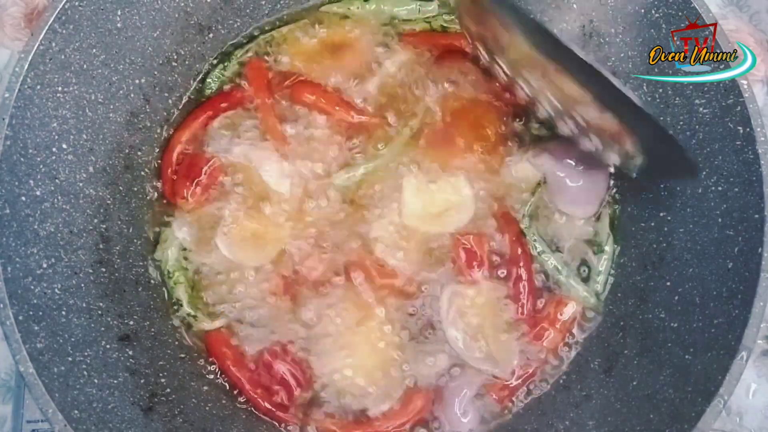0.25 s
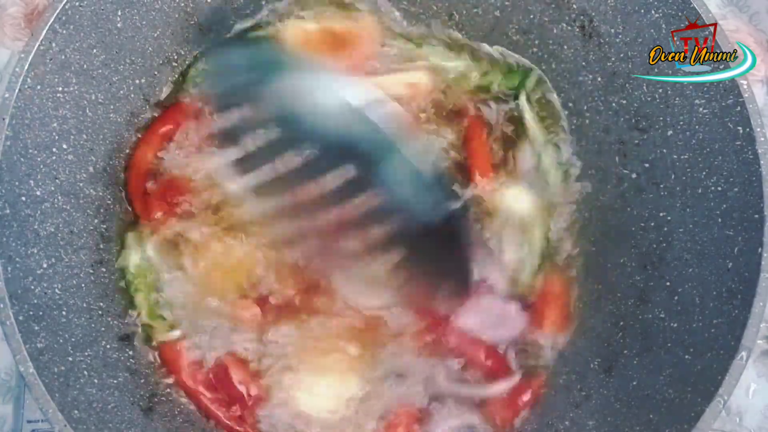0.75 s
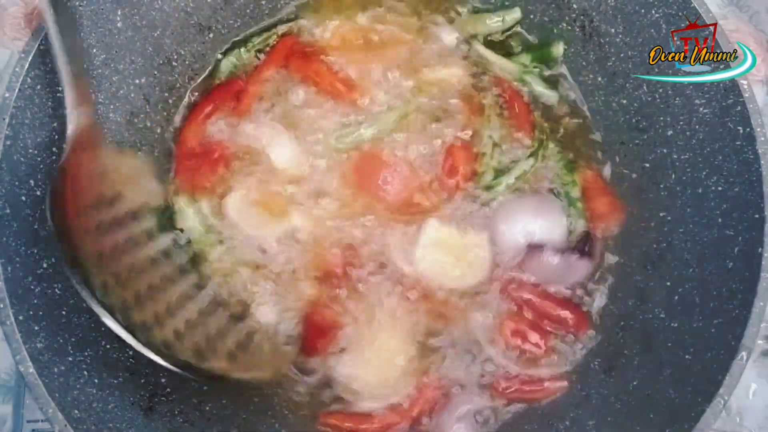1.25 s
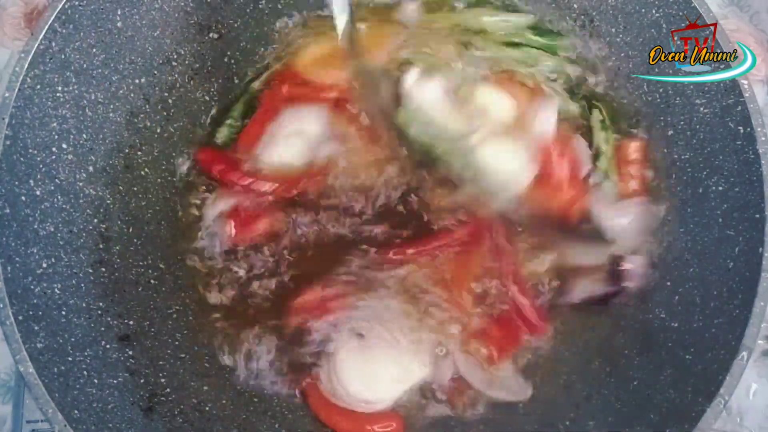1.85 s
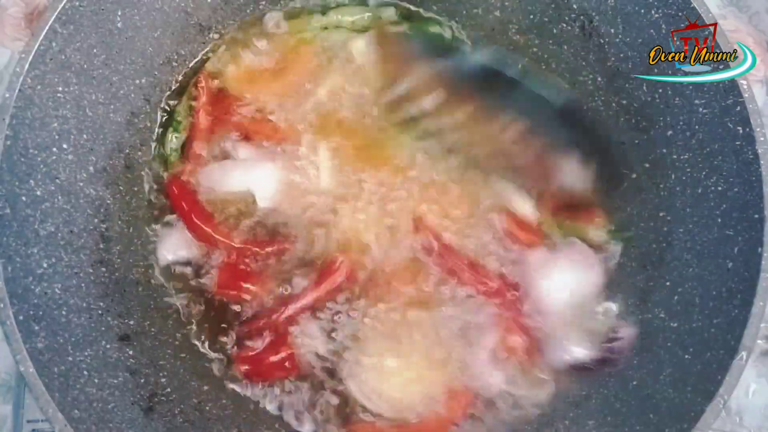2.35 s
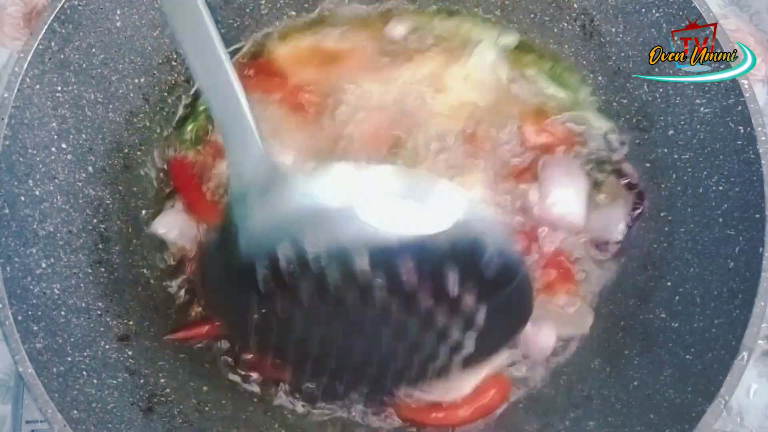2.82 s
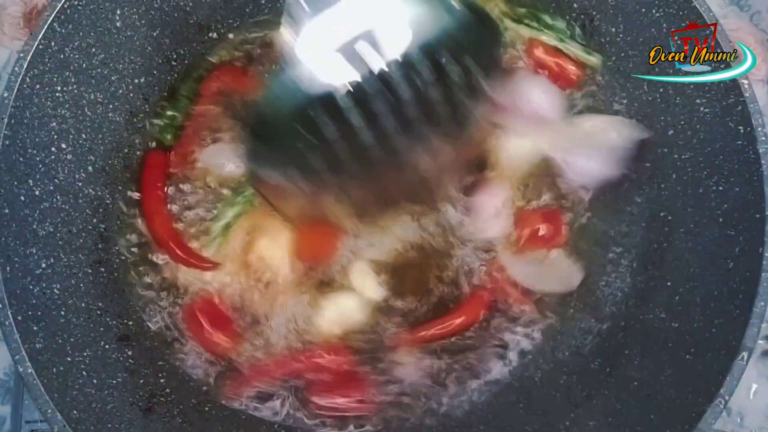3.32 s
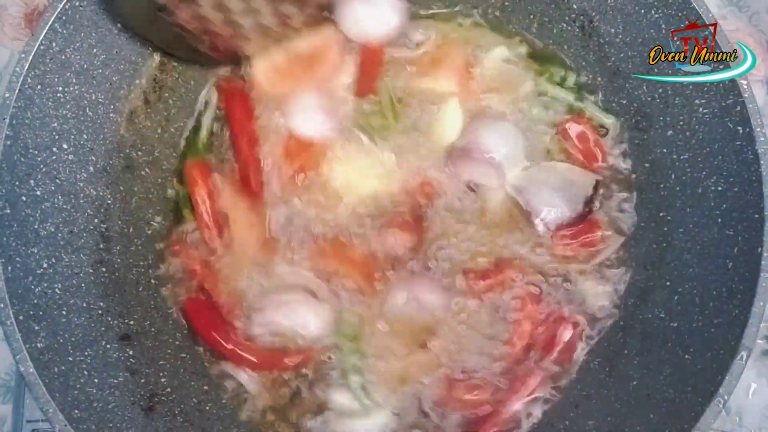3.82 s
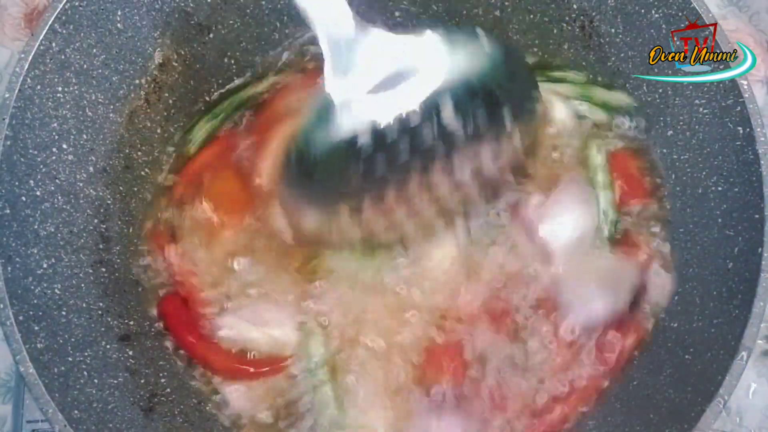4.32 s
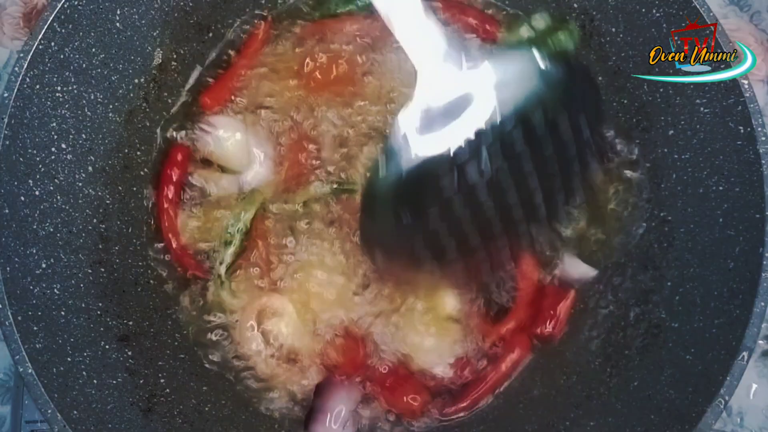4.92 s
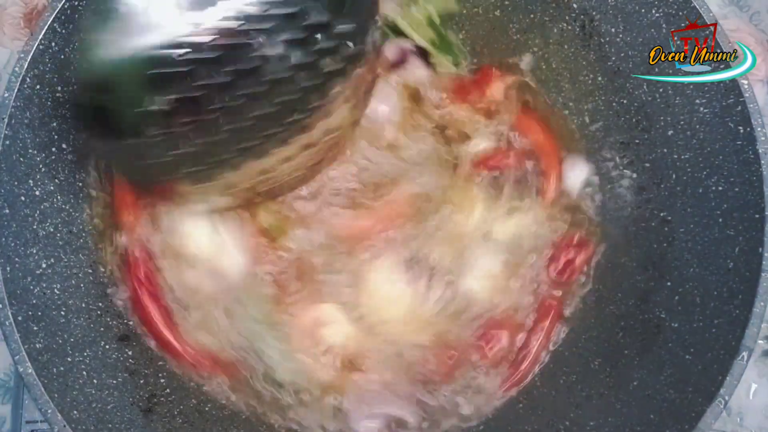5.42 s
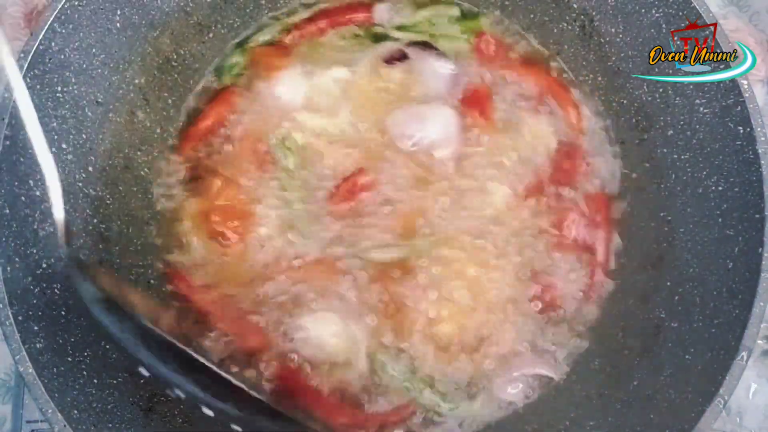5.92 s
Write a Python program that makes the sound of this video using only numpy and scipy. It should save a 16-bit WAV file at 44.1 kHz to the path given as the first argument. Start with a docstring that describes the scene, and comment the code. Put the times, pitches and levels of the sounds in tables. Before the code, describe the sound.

Vegetables sizzle and pop in hot oil while a metal ladle knocks and scrapes dully on a wok.

```python
"""Stir-frying in a wok

Chillies, onion and garlic fry in oil in a small, hard-walled kitchen. Steam bubbles burst as tiny
pitched pips: single ones at first, then a dense sizzle as stirring brings wet pieces into the oil.
A slotted ladle knocks dully and scrapes on the wok, and the room reverberates after every sound."""
import sys
import numpy as np
from scipy import signal
from scipy.fft import rfft, irfft
from scipy.io import wavfile

SR = 44100
rng = np.random.default_rng(int(sys.argv[2]) if len(sys.argv) > 2 else 0)


def dump(signal):
    """Clip the signal to [-1, 1] and save it as 16-bit WAV at the path in sys.argv[1]."""
    limited = np.clip(np.atleast_2d(signal).T, -1, 1)
    pcm = np.round(limited * 32767).astype(np.int16)
    wavfile.write(sys.argv[1], SR, pcm)


N = 271656
TIME = np.arange(N) / SR
CUTOFF_HZ = 15700


def from_db(db):
    return 10 ** (np.asarray(db) / 20)


def unit_rms(x):
    return x / np.sqrt(np.mean(x ** 2) + 1e-20)


def at_hz(table, hz):
    """Interpolation on a logarithmic frequency axis."""
    freqs, values = np.transpose(table)
    return np.interp(np.log(np.maximum(hz, 1)), np.log(freqs), values)


def at_time(table, s=TIME):
    return np.interp(s, *np.transpose(table))


def band(x, low_hz, high_hz, order=2):
    edges = [low_hz, min(high_hz, .48 * SR)]
    return signal.sosfilt(signal.butter(order, edges, "band", fs=SR, output="sos"), x)


def add(track, s, sound):
    start = max(round(s * SR), 0)
    track[start:start + len(sound)] += sound[:max(N - start, 0)]


def coloured_noise(spectrum):
    """Spectral shaping of white noise, at unit rms."""
    gain = from_db(at_hz(spectrum, np.arange(N // 2 + 1) * SR / N))
    return unit_rms(irfft(rfft(rng.standard_normal(N)) * gain, N))


def pips(s, height, hz, swell_s, half_samples):
    """Gaussian tone pulses: sines that swell and fade around the times s."""
    centre = np.round(s * SR).astype(int)[:, None]
    offset = np.arange(-half_samples, half_samples)
    t = offset / SR
    envelope = height[:, None] * np.exp(-(t / np.reshape(swell_s, (-1, 1))) ** 2)
    waves = envelope * np.sin(2 * np.pi * hz[:, None] * t)
    return np.bincount(np.clip(centre + offset, 0, N).ravel(), waves.ravel(), N + 1)[:N]


# Spectrum of the background: f/Hz, relative density level/dB
HISS_SPECTRUM = [(30, -11), (140, 0), (250, -5), (400, -8), (560, -3), (900, -2), (1500, -1), (2200, -4),
                 (3200, -6), (4600, -8), (8000, -9), (10000, -15), (15800, -21)]
def background_hiss(level_db=-69.5):
    """Stationary broadband noise forms a faint, even floor."""
    return from_db(level_db) * coloured_noise(HISS_SPECTRUM)


# Reverberation time: f/Hz, T60/s
ROOM_DECAY = [(80, .41), (210, 0.35), (560, .42), (1500, 0.33), (4000, 0.31), (8000, 0.25), (15000, 0.2)]
# Strength of the reverberation: f/Hz, level/dB re the exciting sound
ROOM_GAIN = [(60, -29.5), (120, 14), (200, 7), (290, -10), (500, -5), (1000, -4), (2200, -1.5), (4000, -7),
             (8000, -6.5), (15000, -6.5)]
def kitchen_response(onset_s=0.001):
    """Diffuse reverberation: dense wall reflections decay exponentially in each band, the lows last."""
    t = np.arange(round(.7 * SR)) / SR
    white, response = rng.standard_normal((2, len(t))), 0
    onset = 1 - np.exp(-(t / onset_s) ** 2)
    edges = 45 * 2 ** np.arange(0, 9, .5)  # half octaves
    for k, (low, high) in enumerate(zip(edges, edges[1:])):
        hz = np.sqrt(low * high)
        tail = band(white[k % 2], low, high, order=3) * from_db(-60 * t / at_hz(ROOM_DECAY, hz)) * onset
        unity_gain = np.sqrt(2 * (high - low) / SR / np.sum(tail ** 2))
        response += tail * unity_gain * from_db(at_hz(ROOM_GAIN, hz))
    return response


# The ladle dragging over the wok's bottom: t/s, level/dB
SCRAPE_LEVEL = [(0.345, -100), (0.36, -47), (0.41, -49), (0.46, -58), (0.5, -100), (3.81, -100),
                (3.83, -51), (3.9, -49.5), (3.96, -49), (4.0, -43), (4.1, -51), (4.19, -60.5),
                (4.27, -73.5), (4.4, -100)]
# Spectrum of the scrape: f/Hz, relative density level/dB
SCRAPE_SPECTRUM = [(60, -13), (110, -17.5), (175, 8.5), (280, 2), (500, -3.5), (800, 8.5), (1300, -2.5),
                   (2000, -10.5), (2800, -28), (6000, -29.5)]
def ladle_scrape(slips_per_s=130, uneven_db=6.5):
    """Stick-slip friction: the ladle catches and slips, modulating a noise unevenly."""
    slips = np.interp(TIME * slips_per_s, np.arange(3000), rng.standard_normal(3000))
    roughness = unit_rms(from_db(uneven_db * slips))
    return from_db(at_time(SCRAPE_LEVEL)) * roughness * coloured_noise(SCRAPE_SPECTRUM)


# Ladle on wok: t/s, edge level/dB, centre f/Hz, bandwidth/centre, crack level/dB re edge,
# bowl delay/s, bowl level/dB, thump drive/dB re bowl, rattle level/dB re edge
IMPACTS = [(.3440, -17.5, 1380, 0.42, -23.5, 0.0047, -23.5, -5.5, -10.5),
           (0.3553, -36, 960, 0.563, -44, 0.0018, -28, -23, 7.5),
           (0.3795, -35, 1500, 0.35, -40, 0.0016, -45, -25, -10),
           (0.4028, -31, 1970, 0.55, -40, .003, -31, -30, -17),
           (0.4192, -21.5, 3110, 0.25, -47, 0.0005, -47, -27, -45),
           (0.4355, -52, 1670, 0.47, -30, 0.0017, -43, -28, 1),
           (0.4565, -52, 2900, 0.25, -30, 0.00057, -56, -31, -12),
           (1.253, -19, 1247, 0.66, -18.5, 0.001, -12, -26, -24),
           (2.9598, -48.5, 988, 0.444, -44.5, 0.00005, -22, -13.5, 4),
           (3.8188, -17, 1440, 0.38, -12.5, 0.0048, -20, -17, -12),
           (3.828, -23, 1780, 0.3, -8, 0.0022, -39.5, -3.5, -15.5),
           (3.851, -53, 1470, 0.42, -22, 0.0025, -31, -22, -10),
           (3.981, -24.5, 1205, 0.46, -36, 0.01176, -30.5, -6, -5.5),
           (4.023, -46.5, 1570, 0.41, -30, 0.00204, -35, -18, 0),
           (4.071, -54, 1470, 0.365, -32.5, 0.0022, -45, -16, 3),
           (4.085, -39.5, 2160, 0.2, -19, .003, -52, -25, -1),
           (5.9151, -40.5, 1183, 0.29, 0, 0.0035, -34, 2.5, 5),
           (6.1187, -40.5, 1095, 0.4, -21, 0.0013, -21, -14, -8.5)]
def ladle_contacts(bowl_pitch_ratio=0.5355, edge_thump_db=-29.5, bowl_crack_db=-34):
    """Double impact: the ladle's edge cracks on the wok, then its bowl lands, lower and with a thump."""
    for s, db, hz, width, crack_db, delay_s, bowl_db, thump_db, _ in IMPACTS:
        bowl_hz = bowl_pitch_ratio * hz
        yield s, db, hz, width * hz, edge_thump_db, crack_db
        yield s + delay_s, bowl_db, bowl_hz, width * bowl_hz, thump_db, bowl_crack_db


def ladle_rattle(gap_s=0.0032, loss_db=0.5, pitch_ratio=0.64, scatter_octaves=0.7, cycles=0.98, taps=8):
    """Rebound: after each knock the ladle judders in a dying run of dull taps of scattered pitch."""
    out = np.zeros(N)
    for s, db, hz, *_, rattle_db in IMPACTS:
        times = s + np.cumsum(gap_s * (.5 + rng.random(taps)))
        pitches = pitch_ratio * hz * 2 ** (scatter_octaves * np.clip(rng.standard_normal(taps), -2, 1))
        heights = from_db(db + rattle_db - loss_db * np.arange(taps))
        out += pips(times, heights, pitches, cycles / pitches, half_samples=300)
    return out


# Modes of the steel ladle: f/Hz, level/dB re crack, T60/s
STEEL_MODES = [(2530, -8.5, 0.052), (3230, -2, 0.044), (3695, -12.5, 0.12), (4946, -14, 0.12)]
# Modes of the oil-damped wok: f/Hz, relative level/dB, T60/s
WOK_MODES = [(95, -4, 0.12), (158, -17.5, 0.27), (194, -16, 0.13), (446, -29, 0.15), (490.8, -23.5, 0.14),
             (650, -36, 0.12), (833, -21.5, 0.33), (1040, -36.5, 0.2), (1226, -45.5, 0.13),
             (1205, -30.5, 0.1), (1370, -39, 0.177), (1474, -42, .15), (1860, -32.5, 0.11)]
def ladle_knocks(gain_db=1, thump_hz=125, thump_s=0.0028, thump_gain_db=-12, crack_s=0.007,
                 wok_gain_db=-5, detune=0.018):
    """Impact excitation: a clack, a low thump and a bright crack, with free decay of ladle and wok."""
    out, t = np.zeros(N), np.arange(SR // 2) / SR
    thump = t / thump_s * np.exp(1 - t / thump_s) * np.sin(2 * np.pi * thump_hz * t)

    def mode(hz, db, t60):
        return from_db(db + rng.normal(0, 2) - 60 * t / t60) * np.sin(2 * np.pi * hz * t)

    for s, db, hz, width_hz, thump_db, crack_db in ladle_contacts():
        age = np.pi * width_hz * t  # dimensionless: a wider band makes a shorter pulse
        clack = np.exp(-((age - 2.2) / 1.2) ** 2) * np.sin(2 * hz / width_hz * (age - 2.2))
        bright_noise = band(rng.standard_normal(len(t)), 2000, 6400, order=5)
        crack = bright_noise * np.exp(-t / crack_s) * np.tanh(age)
        knock = clack + from_db(thump_db + thump_gain_db) * thump + from_db(crack_db) * crack
        for mode_hz, mode_db, t60 in STEEL_MODES:
            # grip and clinging oil retune the ladle at every contact
            knock += mode(mode_hz * (1 + detune * rng.standard_normal()), crack_db + mode_db, t60)
        for mode_hz, mode_db, t60 in WOK_MODES:
            # the thump rocks the whole wok; a soft contact barely drives modes above its own pitch
            drive = from_db(thump_db) if mode_hz < 300 else 1 / (1 + (mode_hz / (hz + width_hz)) ** 6)
            knock += drive * mode(mode_hz, mode_db + wok_gain_db, t60) * rng.choice([-1, 1])
        add(out, s, from_db(db + gain_db) * knock)
    return out


def hollow_wok(x, dip_hz=305, dip_q=4.4):
    """A spectral notch: the wok radiates little between thump and bowl tone, so it sounds hollow."""
    return signal.lfilter(*signal.iirnotch(dip_hz, dip_q, fs=SR), x)


def bursts_per_s(level_db, rest_per_s=20, boil_per_s=480, boil_db=-47):
    """The burst rate grows linearly with the amplitude of the frying."""
    return rest_per_s + boil_per_s * from_db(level_db - boil_db)


def stray_bubbles(per_s=15, low_hz=3300, high_hz=15000, level_db=-55, spread_db=3.5):
    """A steady Poisson process: even in resting oil a lone small bubble bursts now and then."""
    times = TIME[rng.random(N) < per_s / SR]
    place, strength = rng.random((len(times), 2)).T
    heights = from_db(level_db + spread_db * (2 * strength - 1))
    return pips(times, heights, low_hz + (high_hz - low_hz) * place, swell_s=0.0018, half_samples=400)


def gurgles(share=0.13, threshold_per_s=250, low_hz=1750, high_hz=2400, level_db=-49, spread_db=4):
    """Larger bubbles resonate lower; these surface only once the oil boils hard."""
    per_s = share * (bursts_per_s(at_time(VIGOUR_LEVEL)) - threshold_per_s)
    times = TIME[rng.random(N) < per_s / SR]
    place, strength = rng.random((len(times), 2)).T
    heights = from_db(level_db + spread_db * (2 * strength - 1))
    hz = low_hz + (high_hz - low_hz) * np.sqrt(place)
    return pips(times, heights, hz, swell_s=0.001, half_samples=400)


# Loud snaps of water drops: t/s, peak level/dB before filtering
LOUD_SNAPS = [(3.6343, -20.5), (3.7417, -25.5), (3.964, -23), (5.234, -18.5), (5.3129, -18), (5.316, -33)]
def water_spits(rest_per_s=20, per_burst=0.27, above_treble_db=11.5, spread_db=7.5, decay_s=0.00038):
    """Flash evaporation: water in hot oil makes a few loud, pitchless snaps and a fine crackle."""
    treble_db = at_time(TREBLE_LEVEL)
    snapping = rng.random(N) < (rest_per_s + per_burst * bursts_per_s(treble_db)) / SR
    scatter_db = spread_db * np.clip(rng.standard_normal(N), -2, 2)
    clicks = snapping * from_db(treble_db + above_treble_db + scatter_db)
    for s, db in LOUD_SNAPS:
        add(clicks, s, from_db([db]))
    envelope = signal.lfilter([1], [1, -np.exp(-1 / (decay_s * SR))], clicks + 1e-18)
    return band(envelope * rng.choice([-1, 1], N), 7500, CUTOFF_HZ)


# Single big bubbles, from deep plops to high pips: t/s, peak level/dB, f/Hz, swell time/s
BIG_BUBBLES = [(0.0634, -38.5, 4900, 0.0015), (0.1132, -39, 4200, 0.00079), (0.1165, -33.5, 6700, 0.00058),
               (0.1167, -30, 4500, 0.0006), (0.2877, -32, 8990, 0.001), (0.3375, -38.5, 3950, 0.0032),
               (0.4729, -38.5, 7900, 0.0013), (0.4893, -43.5, 8200, 0.00065), (0.6234, -51, 4560, 0.0049),
               (0.6906, -41, 14100, 0.00028), (0.6907, -38, 9470, 0.00061), (0.8322, -43.5, 6710, 0.0038),
               (0.8326, -41, 7800, 0.00053), (0.9277, -43, 7830, 0.00061), (1.0051, -38, 14300, 0.00073),
               (1.065, -55.5, 570, 0.0033), (1.1446, -46.5, 9020, 0.0031), (1.211, -51, 6540, 0.0031),
               (1.215, -53, 3220, 0.0059), (1.4647, -37.5, 3970, 0.0014), (1.4745, -52, 8340, 0.0052),
               (1.5012, -37, 4040, 0.0015), (1.5061, -46, 7860, 0.0011), (1.518, -40.5, 3440, 0.0015),
               (1.5352, -43, 2430, 0.0024), (1.683, -57.5, 490, 0.0046), (1.6897, -43.5, 1970, 0.0021),
               (1.739, -53, 2080, 0.0018), (1.8148, -48, 6900, 0.0041), (1.9024, -50.5, 3950, 0.0013),
               (1.904, -57, 1476, 0.0045), (1.9246, -43, 4000, 0.0025), (2.0192, -37, 7250, 0.0011),
               (2.0558, -40, 7450, 0.0016), (2.0721, -37.5, 7180, 0.00084), (2.1225, -47, 4500, 0.0017),
               (2.1437, -31.5, 6050, 0.00065), (2.1447, -34, 5160, 0.001), (2.1645, -42.5, 7160, 0.0012),
               (2.2163, -39.5, 4810, 0.0013), (2.339, -41, 6360, 0.0011), (2.3772, -40, 10660, 0.00095),
               (2.383, -33, 5710, 0.00046), (2.4388, -30.5, 6730, 0.0016), (2.4919, -39, 10540, 0.0011),
               (2.6158, -44.5, 2860, 0.0009), (2.694, -51, 1056, 0.0054), (2.6966, -43, 820, 0.0061),
               (2.7885, -37.5, 7850, 0.0015), (2.9424, -43, 5890, 0.003), (2.975, -43, 4200, 0.0018),
               (2.9834, -37, 4500, 0.00059), (3.0448, -30, 5240, 0.0012), (3.0957, -37.5, 5180, 0.0027),
               (3.1556, -35.5, 3910, 0.001), (3.1612, -35, 6050, 0.0016), (3.1924, -36, 3750, 0.001),
               (3.2195, -37.5, 4340, 0.00099), (3.2946, -32.5, 5150, 0.00095),
               (3.3085, -36.5, 4780, 0.0012), (3.3377, -33, 5030, 0.001), (3.435, -27.5, 4650, 0.001),
               (3.457, -56, 1980, 0.0072), (3.485, -56.5, 1350, 0.0022), (3.5062, -35, 7440, 0.0017),
               (3.5763, -37.5, 3670, 0.0024), (3.7253, -26, 5000, 0.0012), (3.7561, -35, 3750, 0.00081),
               (3.9251, -27.5, 3230, 0.00083), (4.0159, -33, 3540, 0.0014), (4.0924, -33.5, 7870, 0.0006),
               (4.1695, -35.5, 1350, 0.0024), (4.19, -47.5, 1408, 0.0066), (4.2133, -43, 1280, 0.0037),
               (4.235, -35.5, 4470, 0.0016), (4.2435, -32, 3800, 0.00037), (4.4281, -42, 3814, 0.00095),
               (4.7731, -48.5, 3770, 0.00095), (4.958, -38.5, 4770, 0.0015), (4.994, -39, 3910, 0.0016),
               (4.323, -44.5, 630, 0.005), (4.495, -50.5, 1630, 0.0031), (4.5438, -41, 3600, 0.0021),
               (4.8332, -41, 2517, 0.0016), (4.9136, -52.5, 787, 0.0041), (5.0221, -41, 2660, 0.0018),
               (5.1238, -34, 3750, 0.0012), (5.3557, -51, 643, 0.0041), (5.3944, -31, 5050, 0.00051),
               (5.4995, -28, 4884, 0.0016), (5.6515, -29.5, 7860, 0.00086), (5.7626, -29.5, 7770, 0.00062),
               (5.9048, -22.5, 6320, 0.00044), (5.9496, -27.5, 8230, 0.00048),
               (5.9564, -20.5, 7870, 0.0004), (5.958, -45.5, 2050, 0.0033), (6.0445, -42.5, 2473, 0.002),
               (6.136, -47.5, 2087, 0.0032)]
def bubble_pops(neighbour_db=-17.5, neighbour_octaves=0.38, neighbour_span_s=0.045,
                bounce_db=-12, bounce_s=0.0023, bounces=2):
    """Early reflection: each big bubble bursts as a pip that the wok's sloping wall returns faintly."""
    s, db, hz, swell_s = np.transpose(BIG_BUBBLES)
    # a smaller, higher neighbour bursts just before or after each one
    wait, step = rng.random((len(s), 2)).T
    neighbour_hz = np.minimum(hz * 2 ** (neighbour_octaves * step), CUTOFF_HZ)
    s = np.r_[s, s + neighbour_span_s * (wait - .5)]
    heights = from_db(np.r_[db, db + neighbour_db])
    swell_s = np.r_[swell_s, swell_s * hz / neighbour_hz]
    hz = np.r_[hz, neighbour_hz]
    gaps = bounce_s * (.6 + rng.random((len(s), bounces)))
    delays = np.column_stack([np.zeros(len(s)), np.cumsum(gaps, axis=1)])
    returned = from_db(bounce_db) / (1 + (swell_s / bounce_s) ** 2)  # long pips swallow their echoes
    return sum(pips(s + delays[:, k], heights * returned ** k, hz, swell_s, half_samples=600)
               for k in range(bounces + 1))


def wet_shimmer(x, depth_db=8, width_hz=75, lasting_s=0.05, blur_per_s=520):
    """Spectral modulation: narrow patches swell and fade, sounding wet, and blur as the boil thickens."""
    hz, s, cells = signal.stft(x, SR, nperseg=512, noverlap=384)
    across_hz = np.exp(-((hz[:21] - hz[10]) / width_hz) ** 2)
    across_time = np.exp(-((s[:101] - s[50]) / lasting_s) ** 2)
    patches = signal.fftconvolve(rng.standard_normal(cells.shape), np.outer(across_hz, across_time), "same")
    blur = 1 + (bursts_per_s(at_time(VIGOUR_LEVEL, s)) / blur_per_s) ** 2
    gain = from_db(np.clip(unit_rms(patches), -1.4, 1.6) * depth_db / blur)
    gain /= np.sqrt(np.mean(gain ** 2, axis=0))
    return signal.istft(cells * gain, SR, nperseg=512, noverlap=384)[1][:N]


# Envelopes of the sizzle's bands, low to high: t/s, relative level/dB
COARSE_LEVEL = [(0.0, -84), (0.04, -67.5), (0.28, -88.0), (3.3, -71), (3.79, -63.5), (3.95, -58),
                (4.19, -63), (4.27, -53), (4.4, -54), (4.67, -63.5), (4.83, -55), (4.97, -64.5),
                (5.03, -54.5), (5.43, -51), (5.57, -64), (5.9, -55.5), (6.15, -54.5)]
VIGOUR_LEVEL = [(0.0, -57), (0.1, -64), (0.321, -81.0), (1.839, -80.5), (1.921, -62.5), (2.44, -58.0),
                (2.48, -73), (2.64, -63), (2.757, -82.0), (2.8, -64.0), (2.92, -75.5), (2.96, -57.0),
                (3.28, -52.0), (4.149, -53.5), (4.23, -49.5), (4.39, -58), (4.632, -56.5), (4.791, -48.5),
                (5.07, -55.5), (5.112, -49.5), (5.67, -47.5), (5.71, -53), (5.909, -46), (6.071, -51.5),
                (6.15, -45.5)]  # rises as the ladle turns wet pieces into the oil
MIDDLE_LEVEL = [(0.0, -61.5), (0.322, -80.5), (1.8, -81.0), (2.038, -59), (2.16, -58.5), (2.279, -77.0),
                (2.401, -55.5), (2.719, -75.5), (2.802, -58), (3.121, -71.5), (3.2, -54), (3.389, -61.5),
                (3.509, -48.5), (3.59, -57), (4.193, -55), (4.39, -66), (4.429, -56.5), (4.712, -56.5),
                (4.79, -50), (4.952, -57.5), (5.35, -48), (5.43, -55.5), (5.748, -46), (6.15, -44.5)]
TREBLE_LEVEL = [(0.0, -60), (0.2, -86), (1.8, -84), (1.95, -77), (1.981, -66), (2.08, -62), (2.159, -71),
                (2.269, -71), (2.399, -59.5), (2.56, -71.5), (2.64, -86.5), (2.739, -78), (2.799, -60),
                (3.002, -60.5), (3.078, -73.5), (3.16, -55.5), (3.31, -65.5), (3.39, -59), (3.51, -65),
                (3.629, -58.5), (3.83, -55.5), (3.91, -61), (4.109, -54.5), (4.231, -67.5), (4.43, -77),
                (4.469, -59), (4.83, -55.5), (5.029, -61), (5.19, -57.5), (5.241, -53.5), (5.43, -55),
                (6.07, -50.5), (6.15, -54.5)]  # shared by the two finest sizes
# Five bubble sizes, coarse to fine: level/dB re envelope, relative number of bubbles
BUBBLE_SIZES = [(-1.5, 3), (0.5, 2.2), (0, 3), (-3.5, 4), (-4, 5)]
# Band edges of those sizes: f/Hz
BAND_EDGES = [2400, 3400, 6000, 9300, 12000, 15600]
# Weighting of the bursts by pitch: f/Hz, level/dB
BURST_SPECTRUM = [(2400, -1.5), (2750, 3), (3200, -4), (3750, 4), (4400, 1), (5050, -1), (5900, 0),
                  (8000, 3.5), (9300, -1), (10500, 2), (12500, 0), (15500, 7)]
def sizzle(gain_db=2.3, spread_db=7.5, swell_s=0.0017, swell_spread=0.6, steam_db=-9, steam_growth=.35):
    """Incoherent summation: countless small bubbles burst at random, with a hiss of steam between them."""
    out = np.zeros(N)
    envelopes = [COARSE_LEVEL, VIGOUR_LEVEL, MIDDLE_LEVEL, TREBLE_LEVEL, TREBLE_LEVEL]
    for envelope, (trim_db, plenty), low, high in zip(envelopes, BUBBLE_SIZES, BAND_EDGES, BAND_EDGES[1:]):
        band_db = at_time(envelope) + trim_db
        per_s = plenty * bursts_per_s(band_db)
        # Poisson process: a bubble bursts when the expected count reaches its turn
        expected = np.cumsum(per_s) / SR
        turn = np.cumsum(rng.exponential(size=8000))
        born = turn < expected[-1]
        s = np.interp(turn[born], expected, TIME)
        hz = low + (high - low) * rng.random(8000)[born]
        strength, length = np.clip(rng.standard_normal((2, 8000)), -2, 2)[:, born]
        swells = np.clip(swell_s * np.exp(swell_spread * length), 4.5 / hz, .003)
        # powers add, so the busier the boil, the smaller each bubble's share
        overlap = np.interp(s, TIME, per_s) * swells * np.sqrt(np.pi / 8)
        share = unit_rms(from_db(spread_db * strength)) / np.sqrt(overlap)
        level_db = np.interp(s, TIME, band_db) + at_hz(BURST_SPECTRUM, hz) + gain_db
        out += pips(s, share * from_db(level_db), hz, swells, half_samples=260)
        steam = unit_rms(band(rng.standard_normal(N), low, high, order=6))
        above_boil_db = band_db + 47  # a full boil lies at -47 dB
        out += from_db(band_db + steam_db + steam_growth * above_boil_db) * steam
    return out


def scene(shade_db=-7, pop_echo_db=2, stir_echo_db=-1.5):
    """Superposition of direct and reverberant sound; the pieces shade the small bubbles' direct path."""
    room = kitchen_response()
    hiss = background_hiss()
    pops = bubble_pops() + stray_bubbles() + water_spits()
    ladle = hollow_wok(ladle_knocks() + ladle_rattle() + ladle_scrape())
    fizz = sizzle() + gurgles()
    frying_echo = signal.fftconvolve(fizz + from_db(pop_echo_db) * pops, room)[:N]
    frying = pops + wet_shimmer(from_db(shade_db) * fizz + frying_echo)
    stirring = ladle + from_db(stir_echo_db) * signal.fftconvolve(ladle, room)[:N]
    return (hiss + stirring + frying)[None]


def record(dry, low_cut_hz=65):
    """Band limiting: the microphone drops the deep bass, and a steep low-pass cuts the top."""
    thin = signal.sosfilt(signal.butter(2, low_cut_hz, "high", fs=SR, output="sos"), dry)
    return signal.sosfilt(signal.ellip(10, .2, 70, CUTOFF_HZ, fs=SR, output="sos"), thin)


dry = scene()
out = record(dry)
dump(out)
```